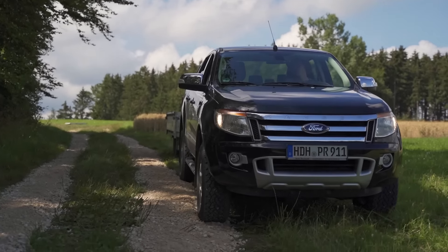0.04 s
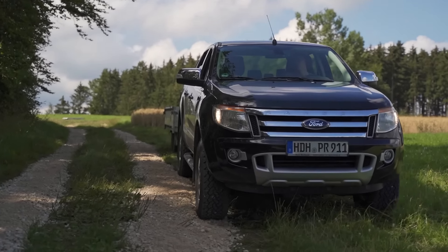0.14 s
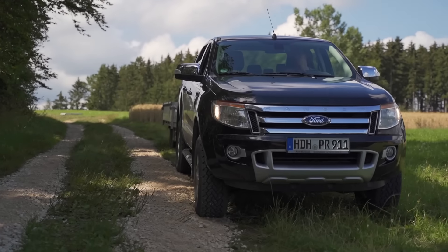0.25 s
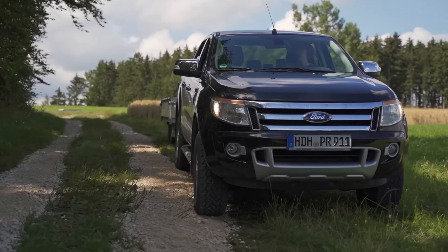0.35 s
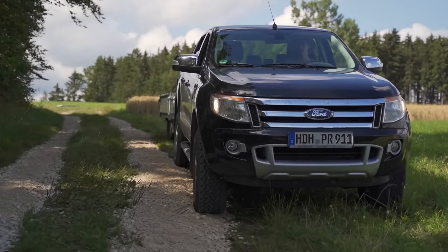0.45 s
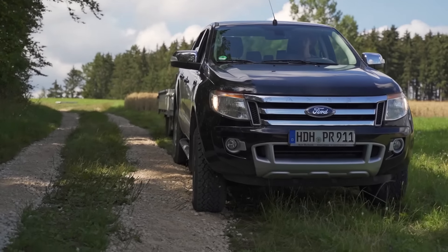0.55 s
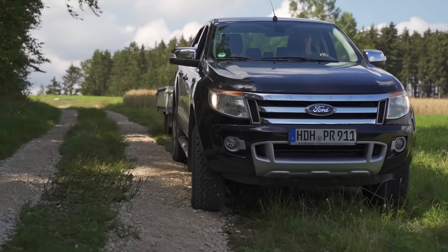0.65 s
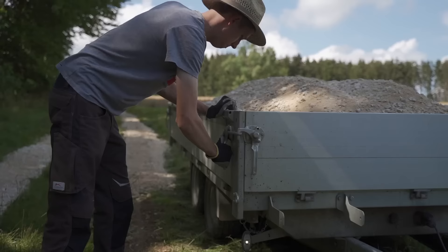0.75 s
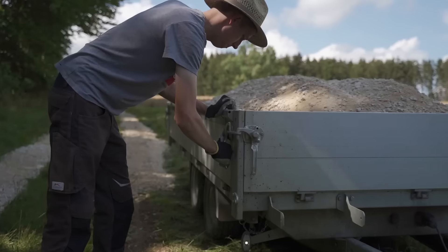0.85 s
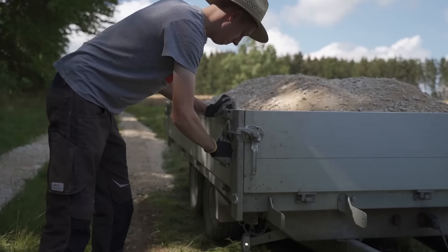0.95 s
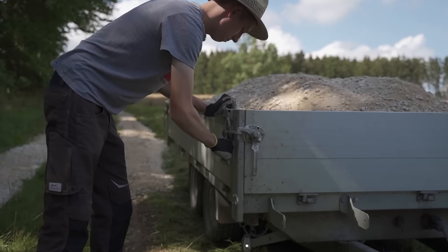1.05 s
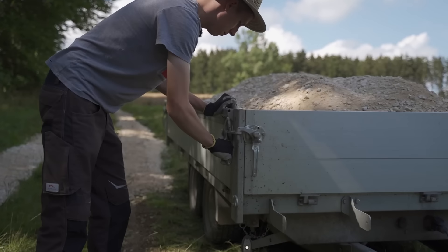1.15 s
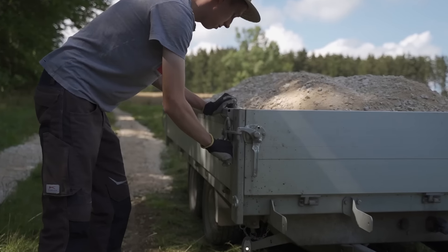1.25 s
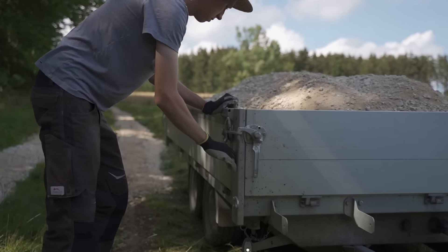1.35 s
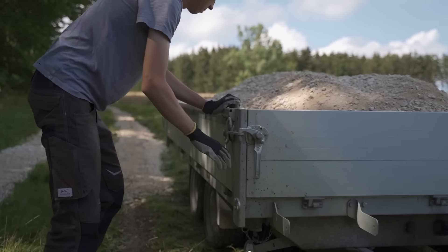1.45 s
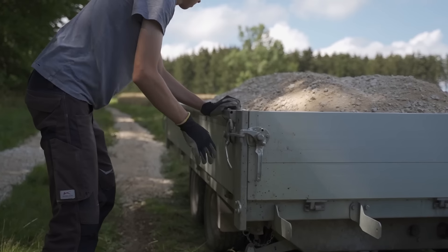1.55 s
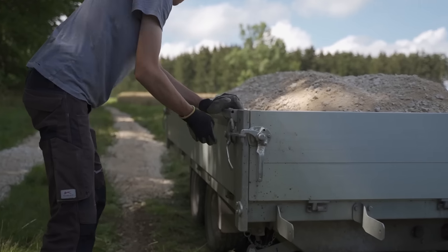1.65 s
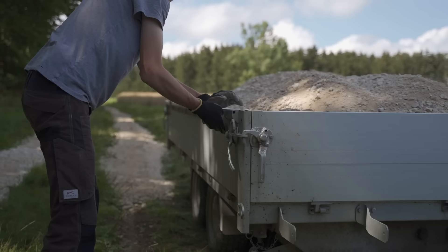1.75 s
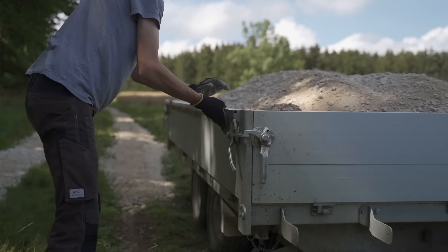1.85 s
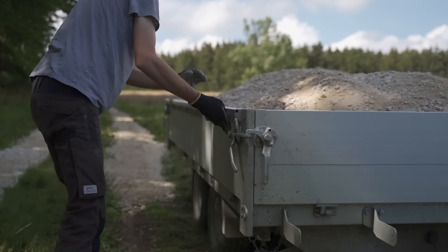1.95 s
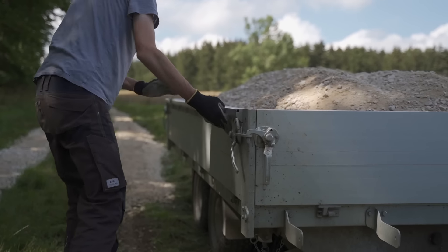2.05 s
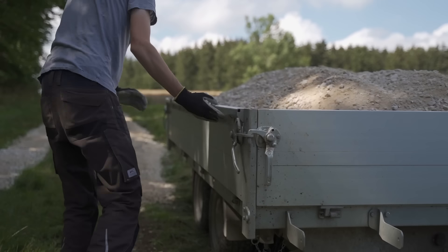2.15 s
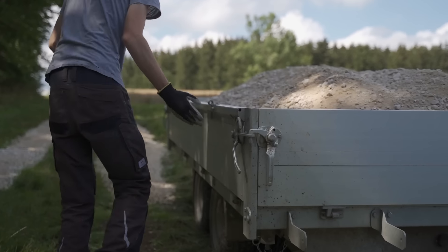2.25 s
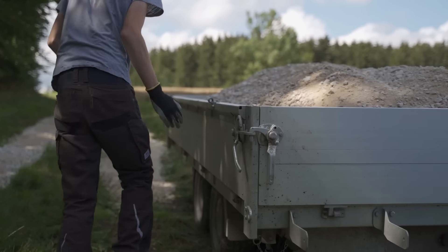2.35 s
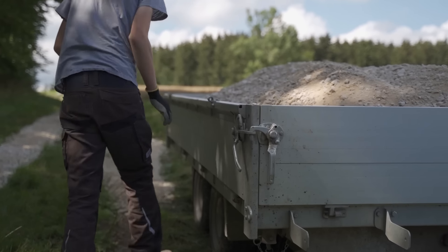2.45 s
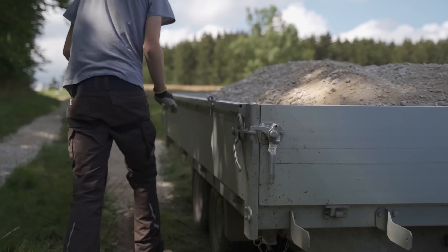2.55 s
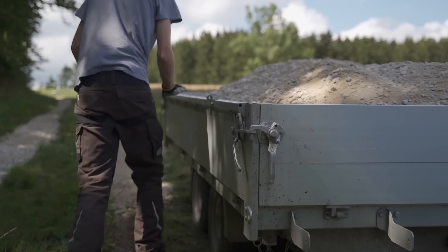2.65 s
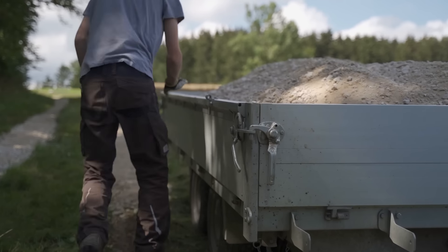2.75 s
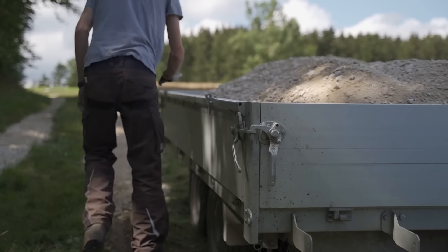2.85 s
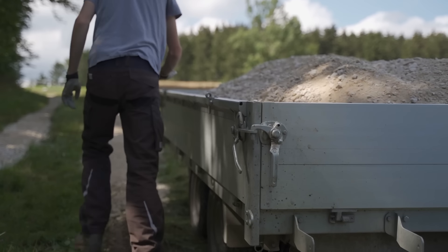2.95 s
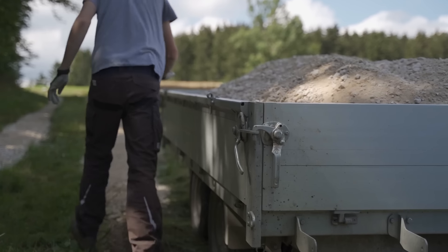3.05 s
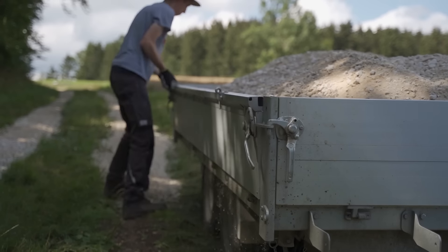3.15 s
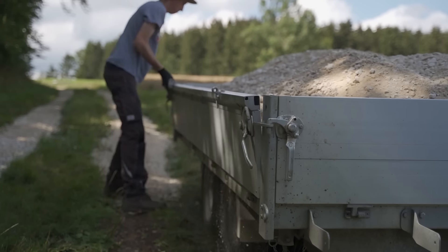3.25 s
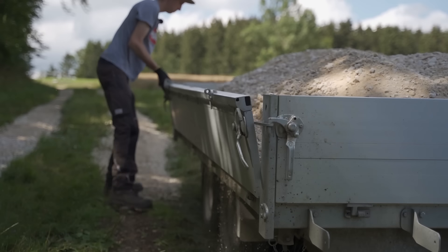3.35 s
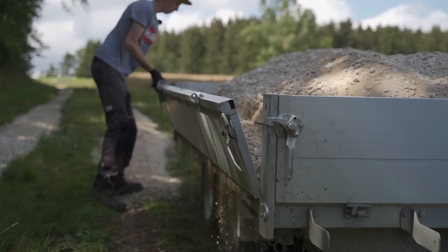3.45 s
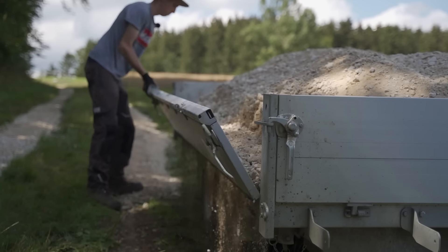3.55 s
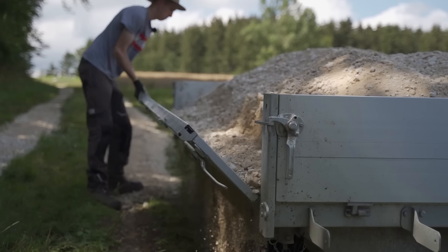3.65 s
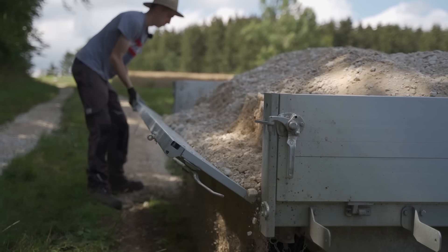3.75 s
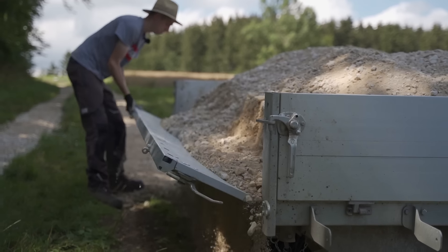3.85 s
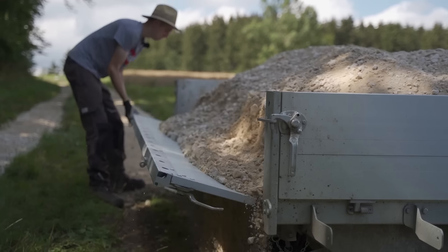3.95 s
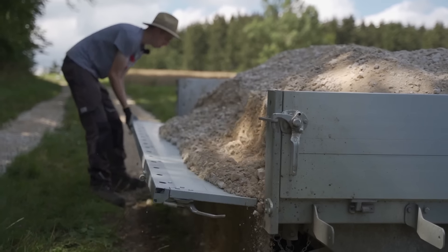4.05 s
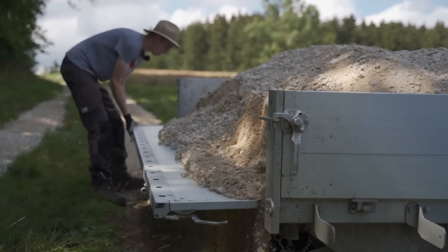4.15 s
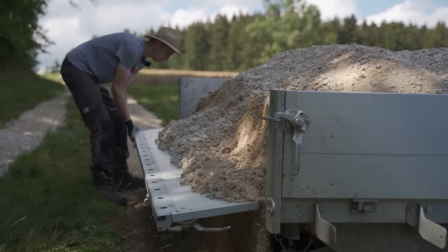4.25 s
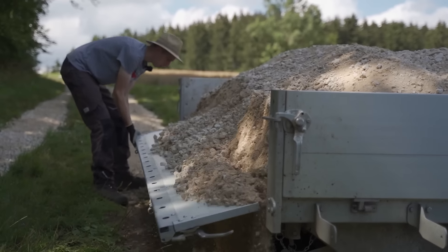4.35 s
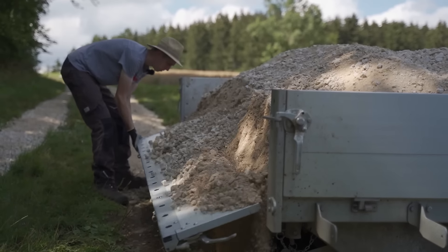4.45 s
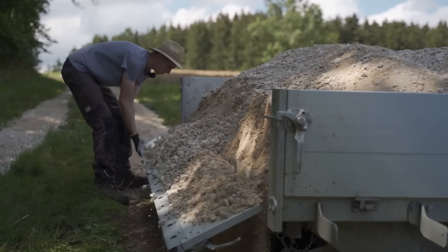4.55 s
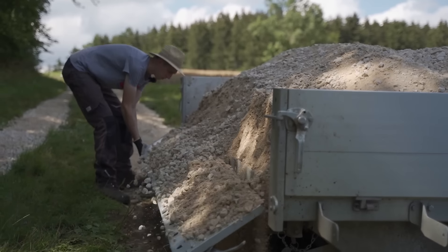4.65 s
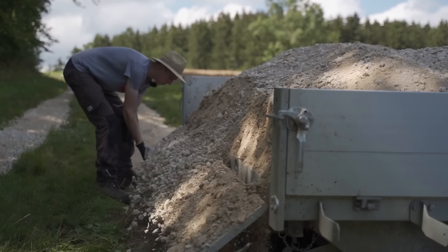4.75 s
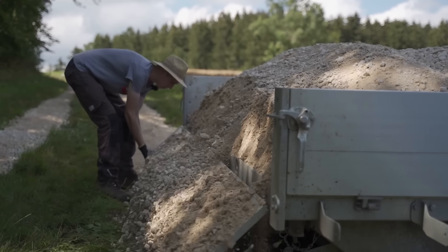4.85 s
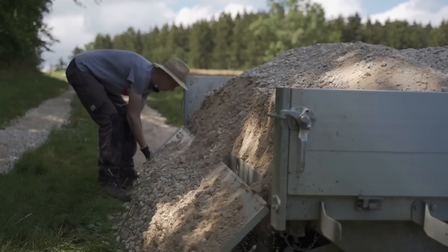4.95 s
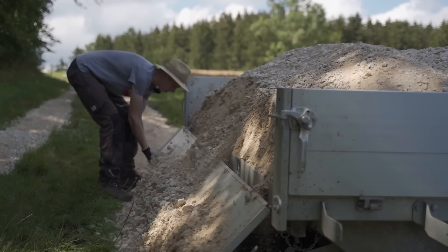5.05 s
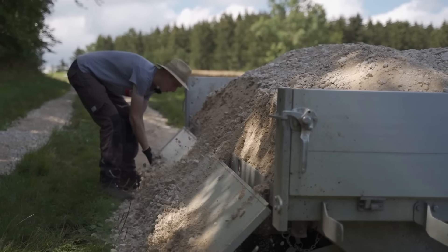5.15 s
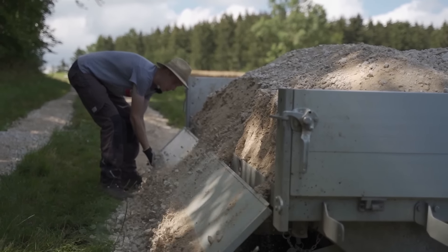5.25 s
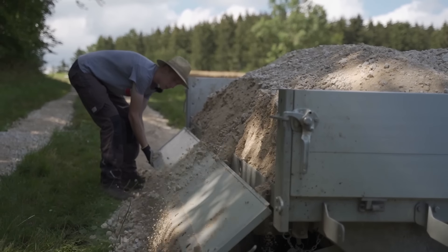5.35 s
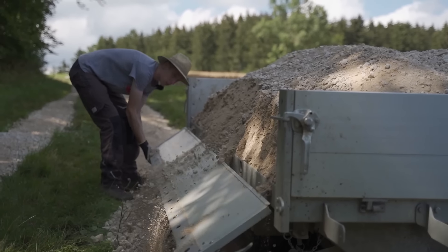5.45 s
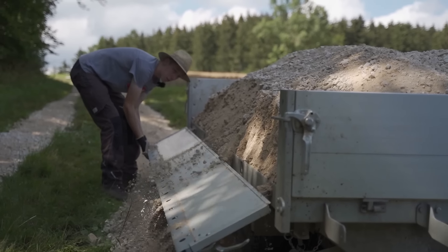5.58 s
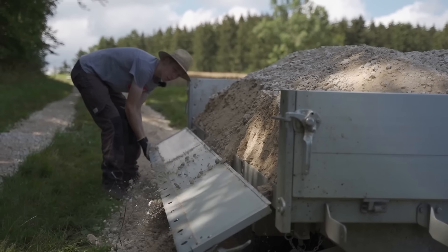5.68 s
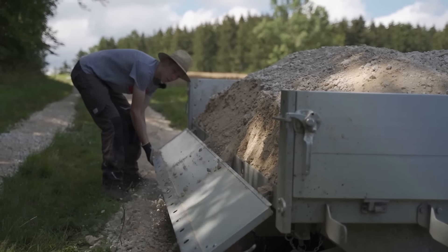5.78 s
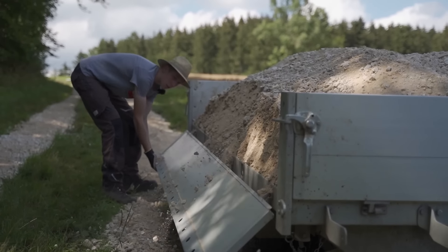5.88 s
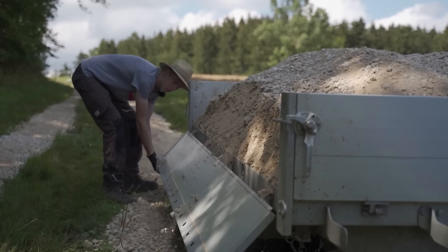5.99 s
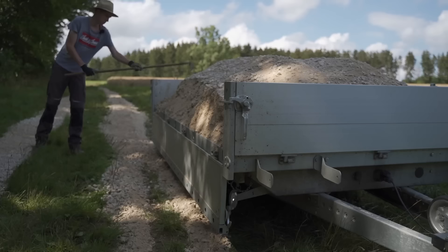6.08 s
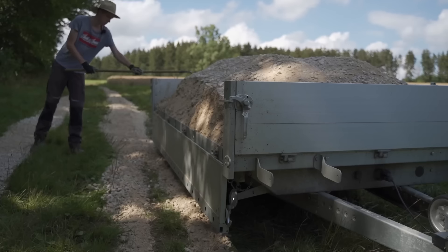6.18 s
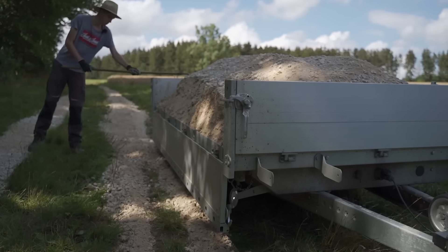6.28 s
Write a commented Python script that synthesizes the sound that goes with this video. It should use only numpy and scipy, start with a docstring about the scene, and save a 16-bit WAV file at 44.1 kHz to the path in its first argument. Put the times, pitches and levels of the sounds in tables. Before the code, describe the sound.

Quiet outdoor air, brief far engine hum, latch knocks, then gravel pours hissing and rattling over a metal trailer side before stopping abruptly.

```python
"""Gravel trickles from a trailer and swells to a rush over its lowered steel side board; the rush cuts off
abruptly and a few stones are heard. Many tiny impacts, shaped by the board's resonances, make its noise.
Before that a worker knocks the latch open twice: the latch bar rattles, clothes rustle, faint ticks sound.
A far engine, a hum in dull noise, is cut off early on; air is soft noise and jolts are short bass pushes.
The near sounds come from a little to the left of a pair of ports."""
import sys
import numpy as np
from scipy import signal
from scipy.fft import rfft, irfft, next_fast_len
from scipy.io import wavfile
from scipy.ndimage import map_coordinates

SR = 44100
rng = np.random.default_rng(int(sys.argv[2]) if len(sys.argv) > 2 else 0)


def inscribe(sig):
    """Save sig as 16-bit PCM at rate SR to the path in sys.argv[1].

    A 1-D sig is mono; a 2-D sig holds one channel per row.
    Samples are clipped to [-1, 1] before scaling.
    """
    pcm = np.round(np.clip(np.atleast_2d(sig).T, -1, 1) * 32767)
    wavfile.write(sys.argv[1], SR, pcm.astype(np.int16))


N = 278712
TIME = np.arange(N) / SR  # [s]
CUT_S = 6.121  # the near sound cuts off abruptly here; a few stones are heard after it


def amp(db):
    """Turn decibels into gain."""
    return 10 ** (np.asarray(db) / 20)


def unit(x):
    """Scale a sound to an rms of 1."""
    return x / np.sqrt(np.mean(x ** 2) + 1e-20)


def along(points, hz):
    """Read a curve of (frequency, value) points on a log frequency axis."""
    f, v = np.transpose(points)
    return np.interp(np.log(hz + 1), np.log(f + 1), v)


def curves(rows):
    """Give one value per sample for each column after the time."""
    s, *cols = np.transpose(rows)
    return [np.interp(TIME, s, c) for c in cols]


def wobble(rate):
    """Draw a smooth random curve with this many random points a second."""
    points = rng.standard_normal(int(N * rate / SR) + 4)
    return map_coordinates(points, [np.arange(N) * rate / SR])


def filtered(x, response):
    """Shape the spectrum of a sound by a (complex) response of frequency."""
    m = next_fast_len(N + SR // 2)
    return irfft(rfft(x, m) * response(np.fft.rfftfreq(m, 1 / SR)), m)[..., :N]


def below(f, edge_hz):
    """Steep loss above an edge, from three equal low-pass stages."""
    return 1 / (1 + 1j * f / edge_hz) ** 3


def body(peaks):
    """Response of an object with resonances (frequency [Hz], width [Hz], level [dB]), signs alternating."""
    def response(f):
        total = 0
        for k, (c, w, db) in enumerate(peaks):
            total = total + (-1) ** k * amp(db) * 1j * f * w / (c * c - f * f + 1j * f * w)
        return total
    return response


def impacts(rate, spread_db, life_s):
    """Noise chopped into hits with sudden starts and quick decay; a negative spread makes a few weaker."""
    hit = rng.random(N) < rate / SR
    size = hit * amp(spread_db * np.minimum(rng.exponential(1, N), 4))
    envelope = signal.lfilter([1], [1, -np.exp(-1 / (life_s * SR))], size)
    return unit(envelope * rng.standard_normal(N))


def pair(x, alike):
    """Mix two noises to a left and a right of the given likeness."""
    turn = lambda hz: np.arccos(np.clip(alike(hz), -1, 1)) / 2
    mid, side = filtered(x, lambda hz: np.array([np.cos(turn(hz)), np.sin(turn(hz))]))
    return np.array([mid + side, mid - side])


# colour of the field air: (frequency [Hz], level per Hz [dB])
AIR_COLOUR = [(12, -29), (20, -1), (86, -1.5), (120, 1), (228, -2), (262, 3), (301, -1.5), (410, 1),
              (527, -1.5), (718, 0.5), (1090, -4.5), (4300, -13), (16000, -15)]
# likeness of its left and right: (frequency [Hz], likeness [0 to 1])
AIR_LIKENESS = [(60, 1), (240, 0.97), (950, 0.96), (3770, 0.18), (15000, 0.11)]
AIR_DB = -65


def air():
    """Quiet breeze over the field: steady noise, less alike left and right in the treble."""
    noise = unit(filtered(rng.standard_normal((2, N)), lambda f: amp(along(AIR_COLOUR, f))))
    return amp(AIR_DB + 0.39 * wobble(9.2)) * pair(noise, lambda f: along(AIR_LIKENESS, f))


# colour of the engine's noise, before its low bass is cut: (frequency [Hz], level per Hz [dB])
ENGINE_COLOUR = [(12, -39), (20, -39), (49, -10.5), (103, 0), (201, -3), (318, -8), (427, -7), (474, -8),
                 (561, -6), (908, -11.5), (1850, -35.5), (3000, -34.5), (3900, -43), (6600, -120)]
# strength of each multiple of the firing rate, from the first up: level against the noise [dB]
ENGINE_ORDERS = [-10.5, -4.5, -13, -21, -22, -21.5, -12, -11, -30]
FIRING_HZ, ENGINE_DB, ENGINE_CUT_S = 26.7, -55, .783


def engine():
    """A far idling engine: multiples of its firing rate hum in dull noise, both sides alike; cut off abruptly."""
    colour = lambda f: amp(along(ENGINE_COLOUR, f)) * f ** 2 / (f ** 2 + 90 ** 2)
    noise = unit(filtered(rng.standard_normal(N), colour))
    turn = 2 * np.pi * FIRING_HZ * np.cumsum(1 + 0.0038 * wobble(3.3)) / SR  # the speed drifts a little
    waver = amp(1.5 * wobble(12))
    hum = 0
    for order, db in enumerate(ENGINE_ORDERS, start=1):
        own_waver = np.roll(waver, rng.integers(N))
        hum = hum + amp(db) * own_waver * np.sin(order * turn + 2 * np.pi * rng.random())
    audible = TIME < ENGINE_CUT_S
    return audible * amp(ENGINE_DB + 0.71 * wobble(11)) * (noise + hum)


# thin modes of the board: (frequency [Hz], level [dB], time to fall by 60 dB [s])
STEEL_MODES = [(1248, -10, .08), (1567, -8, .08), (1813, -7, .1), (2934, -8, .08), (3240, -6, .08),
               (3414, -6, .08), (3590, -1, .12), (3890, -4, .11), (4224, -2, .12), (4576, -3, .11),
               (4953, -1, .14), (5357, -2, .12), (5776, -6, .1), (6256, -8, .1), (6837, -9, .1),
               (7230, -9, .08), (7747, -10, .1)]


def steel(f, spread_db=0):
    """The long thin modes of the board; a spread raises or lowers each one by at most that much."""
    peaks = []
    for hz, db, t60 in STEEL_MODES:
        width_hz = np.log(1000) / np.pi / t60  # a longer ring means a narrower resonance
        peaks.append((hz, width_hz, db + rng.uniform(-spread_db, spread_db)))
    return body(peaks)(f)


# low bending of the board: (centre [Hz], width [Hz], level [dB])
BOARD_BENDING = [(283.5, 106, -2), (685, 443, 0), (990, 780, -10)]
# the board's hollow steel section: (centre [Hz], width [Hz], level [dB])
HOLLOW_SECTION = [(1726, 920, 4), (2325, 2030, 2), (3136, 680, 1.5), (3940, 3700, -5)]
# colour of fine grit: (frequency [Hz], level per Hz [dB])
GRIT_COLOUR = [(2350, -11.5), (4000, -7.5), (4820, -9.5), (5540, -6), (9060, -4.5), (11900, -12.5),
               (15200, -16.5), (16000, -31.5)]
# how many of the stones run over the bare board: (time [s], share [0 to 1])
BARE_SHARE = [(3.0, .05), (4.2, 0.069), (4.7, 0.65), (5.4, 0.97), (5.5, 0.94), (6.1, 0.87), (6.15, 0.81)]
# The three contact tables share these columns, with levels before the last filters:
# (time [s], knock level [dB], clatter level [dB], crack level [dB],
#  knock pitch [Hz], clatter pitch [Hz], time to fall by 60 dB, held to .01-.15 [s])
# faint ticks while the board is handled
HANDLING_TICKS = [(0.104, -42, -58, -53, 625, 1540, 0.057), (0.146, -40.5, -54, -68, 203, 2440, 0.05),
                  (0.386, -46, -53, -52.5, 506, 2610, 0.045), (0.502, -50, -53, -62, 202, 3680, 0.045),
                  (1.636, -64, -60, -67, 711, 1240, 0.045), (1.688, -69, -59, -57, 342, 3760, 0.045),
                  (2.087, -48, -69, -72, 420, 3040, 0.045), (2.268, -65, -69, -59.5, 673, 2870, 0.045),
                  (2.366, -54, -57, -54, 869, 2070, 0.033), (2.876, -46.5, -61, -72, 598, 3020, 0.045),
                  (2.958, -56, -45, -49, 474, 1770, 0.045), (2.985, -43, -60, -68, 840, 1460, 0.045),
                  (3.027, -47, -55, -69, 786, 1470, 0.053), (3.135, -56, -64, -42.5, 716, 2990, 0.037),
                  (3.153, -40.5, -57, -40, 603, 4060, 0.041)]
# the latch is knocked open, twice
LATCH_KNOCKS = [(.995, -57, -52, -50, 380, 2740, 0.077), (1.008, -29, -46, -56, 235, 1840, 0.065),
                (1.026, -64, -50, -46, 576, 1800, 0.035), (1.042, -12, -13.5, -8.5, 595, 2420, 0.031),
                (2.521, -33.5, -40, -54, 247, 1300, 0.064), (2.527, -28.5, -33.5, -55, 710, 1410, 0.056),
                (2.541, -21, -27.5, -41.5, 760, 1350, 0.022)]
# the stones that stand out of the stream
SINGLE_STONES = [(3.65, -20, -27, -46.5, 1040, 4420, 0.038), (3.697, -12.5, -28.5, -45, 900, 1270, .04),
                 (3.716, -19.5, -24.5, -27, 646, 2810, 0.054), (3.738, -12.5, -36, -17, 1060, 1270, 0.025),
                 (3.786, -0.5, -14.5, -22, 683, 1210, 0.018), (3.802, -22, -46, -26, 535, 1300, .04),
                 (3.813, -40, -20, -20, 716, 3380, .03), (3.85, -14.5, -44, -21, 850, 1310, .05),
                 (3.881, -14, -26.5, -24.5, 860, 1240, 0.037), (3.932, -23, -21.5, -19.5, 560, 3600, .02),
                 (3.999, -21, -22, -23, 694, 2750, 0.026), (4.037, -28, -21, -26, 810, 2330, .04),
                 (4.049, -11, -18.5, -15.5, 890, 1190, .02), (4.059, -30, -19, -20, 670, 3560, 0.058),
                 (4.099, -13, -21, -14.5, 820, 4000, 0.035), (4.118, -15.5, -14.5, -8.5, 720, 2280, 0.046),
                 (4.13, -12, -39, -21.5, 726, 1250, 0.065), (4.169, -20, -23, -20.5, 805, 2360, .02),
                 (4.214, -7.5, -16, -16, 840, 2300, 0.018), (4.248, -4, -17, -20, 790, 1360, 0.011),
                 (4.289, -14, -16, -9, 570, 2610, .035), (4.307, -15.5, -9.5, -23, 570, 4050, 0.019),
                 (4.319, -11, -17.5, -15.5, 774, 2280, 0.061), (4.378, -7, -20, -11, 670, 2100, 0.011),
                 (4.438, -20, -20, -16, 645, 3700, .08), (4.474, -3.5, -22, -8, 650, 1900, .05),
                 (4.526, -4, -8, -8.5, 630, 1860, 0.021), (4.736, -24, -8.5, -14.5, 744, 3460, 0.024),
                 (4.784, -33, -7.5, -16, 650, 3420, 0.028), (4.988, -13.5, -10.5, -25, 760, 3350, 0.091),
                 (5.048, -4.5, -29, -27, 330, 1630, 0.043), (5.1, -12, -8.5, -18, 674, 3320, 0.12),
                 (5.157, -11.5, -12, -29, 516, 1730, 0.042), (5.296, -33, -15, -35.5, 774, 3300, .07),
                 (5.38, -8.5, -8.5, -31, 594, 1950, 0.072), (5.504, -17, -6.5, -26.5, 640, 2930, 0.064),
                 (5.574, -12.5, -20, -23, 570, 2010, 0.049), (5.611, -16.5, -10.5, -14.5, 580, 2800, 0.039),
                 (5.687, -38, -17, -21.5, 673, 3210, .055), (5.72, -35, -11.5, -10.5, 746, 3420, .12),
                 (5.782, -14.5, -13.5, -33, 586, 3200, 0.085), (5.845, -16, -14.5, -25, 580, 3280, 0.068),
                 (5.871, -12, -27, -26.5, 574, 1520, .04), (5.903, -26, -30, -8.5, 253, 3670, 0.046),
                 (5.969, -30, -26.5, -18, 790, 3200, .05), (6.01, -16, -10.5, -13, 483, 3300, .045),
                 (6.039, -9, -44, -17, 554, 3650, 0.016), (6.054, -14, -18, -9, 560, 4320, 0.028),
                 (6.074, -33, -20.5, -8, 690, 3490, .09), (6.114, -20, -12.5, -13, 517, 2830, 0.016),
                 (6.153, -55, -56, -24, 330, 2920, 0.018), (6.175, -62, -45, -37, 264, 4400, 0.08),
                 (6.202, -25, -25.5, -18.5, 980, 2030, 0.14), (6.233, -45, -24, -20, 790, 2200, 0.032),
                 (6.256, -47, -44, -22.5, 337, 2570, .04), (6.3, -45, -28.5, -23, 1020, 3580, 0.064)]
CRACK_HZ = (4500, 8300)  # each contact cracks somewhere in this range
RING_DB, RING_SPREAD_DB = 36, 7  # strength of the thin modes, and how unevenly one touch reaches them


def contacts():
    """Each contact is a dull knock, a dying noise burst that clatters and cracks, and a ring of thin modes."""
    knocks, bright = np.zeros(N + SR), np.zeros(N + SR)
    t = np.maximum(np.arange(-128, 6016) / SR, 0)  # a silent lead-in, then the contact
    f = np.fft.rfftfreq(len(t), 1 / SR)
    touch = rfft(signal.unit_impulse(len(t), 132))
    hollow, grit = body(HOLLOW_SECTION)(f), amp(along(GRIT_COLOUR, f))
    rise = 1 - np.exp(-t / 0.00021)
    for s, knock_db, clatter_db, crack_db, knock_hz, clatter_hz, t60 in LATCH_KNOCKS + HANDLING_TICKS + SINGLE_STONES:
        first = round(s * SR) - 40
        span = slice(first, first + len(t))
        alive = (t + s < CUT_S) | (s > CUT_S)  # earlier contacts end at the cut
        burst = amp(-60 * t / np.clip(t60, .01, .15)) * rise * rng.standard_normal((3, len(t)))
        # the knock falls by 60 dB in seven cycles
        push = np.sin(2 * np.pi * knock_hz * t) * amp(-60 * t * knock_hz / 7.0) * rise
        knocks[span] += alive * amp(knock_db) * (push + 0.17 * burst[2])

        crack_hz = rng.uniform(*CRACK_HZ)
        narrow = body([(clatter_hz, .25 * clatter_hz, 0)])(f)
        wide = body([(clatter_hz, 1.4 * clatter_hz, 0)])(f)
        clatter = below(f, 2.06 * clatter_hz) * (0.73 * narrow + 0.42 * hollow * wide)
        crack = grit * (0.52 + body([(crack_hz, .25 * crack_hz, 0)])(f))
        parts = irfft(np.array([clatter, crack]) * rfft(burst[:2]))
        peak_gain = amp([clatter_db, crack_db]) / np.abs(parts).max(axis=1)

        bare = np.interp(s, *np.transpose(BARE_SHARE))
        ring = bare * amp(clatter_db + RING_DB) * steel(f, RING_SPREAD_DB)
        bright[span] += alive * (peak_gain @ parts + irfft(ring * touch))
    bend = lambda f: 0.38 * body(BOARD_BENDING)(f) + body([(900, 2600, 3)])(f) * below(f, edge_hz=9600)
    return filtered(knocks[:N], bend) + bright[:N]


def tail(t60):
    """Dying noise of energy 1."""
    t = np.arange(SR // 4) / SR
    x = rng.standard_normal(len(t)) * amp(-60 * t / t60)
    return x / np.linalg.norm(x)


def trailer_answer(hits):
    """The trailer body answers each contact with a short, dull tail."""
    echo = signal.fftconvolve(hits, tail(0.12))[:N]
    return amp(-10) * filtered(echo, lambda f: 1 / (1 + 1j * f / 2500))


# rubs of fabric: (time of the peak [s], level at the peak before band weighting [dB],
#  strongest frequency [Hz], rise [s], fall [s])
CLOTH_RUBS = [(.15, -64.5, 3860, .02, 0.11), (.43, -61.5, 3850, .08, 0.067), (.516, -73.5, 3820, .04, 0.44),
              (1.1, -67.5, 4890, .01, .1), (1.3, -72, 4480, 0.36, .3), (1.442, -57, 6830, 0.078, .02),
              (1.582, -65.5, 6900, 0.13, 0.15), (1.812, -63, 4960, 0.26, 0.089),
              (1.975, -69, 4090, .06, .01), (2.168, -65.5, 5120, 0.18, 0.06), (2.288, -70, 3100, .07, 0.11),
              (2.7, -73, 3420, 0.24, 0.14), (2.856, -67.5, 3100, 0.044, 0.094),
              (2.96, -60.5, 3280, 0.0087, 0.061), (3.03, -60, 3280, 0.022, 0.023),
              (3.1, -63.5, 3480, .03, .03)]
FADE_DB = 20  # a rub changes by this much over its rise and over its fall


def cloth():
    """Clothes rustle: fine grains of noise swell and die in bands around each rub's strongest frequency."""
    fibres = impacts(2500, spread_db=-14.5, life_s=0.0022)
    rubs = []
    for s, db, hz, rise, fall in CLOTH_RUBS:
        distance = np.maximum((s - TIME) / rise, (TIME - s) / fall)
        rubs.append((hz, amp(db - FADE_DB * distance)))
    out = np.zeros(N)
    for c in (3080, 4400, 6530, 10100):  # band centres [Hz]
        band = unit(filtered(fibres, lambda f: body([(c, .45 * c, 0)])(f) ** 2))
        out += band * sum(np.exp(-(np.log(hz / c) / 0.35) ** 2) * level for hz, level in rubs)
    return out


# modes of the latch bar: (frequency [Hz], level [dB], time to fall by 60 dB, at most .5 [s])
LATCH_BAR = [(171, 3.5, 0.2), (355, -12, 1.2), (1310, -10, 0.26), (1904, -12.5, 0.16), (2240, -27, 0.39),
             (2780, -4, 0.11), (3000, -15, 0.18), (4360, -11, 0.26), (5330, -31, 0.23), (5539, -34.5, 0.34),
             (6240, -15.5, 0.2), (6770, -13.5, 0.18), (7100, -34, 0.62), (7300, -23, 0.48),
             (8301, -16, 0.222), (8753, -7, 0.13), (9000, -11, 0.099), (9940, -34, 1.0)]
CLANK_S, CLANK_DB = .787, -43


def clank():
    """The latch bar rattles: its modes swell in briefly, roughened by chatter, and ring out with a scrape."""
    t, chatter, start = np.arange(SR // 2) / SR, wobble(170), round(CLANK_S * SR)
    ring = 0
    for hz, db, t60 in LATCH_BAR:
        mode = amp(db - 60 * t / min(t60, .5)) * np.sin(2 * np.pi * (hz * t + rng.random()))
        own_chatter = chatter[rng.integers(N // 2):][:len(t)]
        ring = ring + mode * (1 + 0.96 * own_chatter)
    rough = filtered(rng.standard_normal(N), body([(1800, 2000, 0), (6500, 6000, -2)]))[:len(t)]
    scrape = amp(-2 - 60 * t / 0.2) * rough
    swell = np.minimum(t / 0.023, 1) ** 2
    return np.pad(amp(CLANK_DB) * swell * (ring + scrape), (start, N - start - len(t)))


# bass jolts through the ground: (time [s], level before decay [dB])
JOLTS = [(1.046, -54), (1.489, -55), (2.089, -69.5), (2.545, -32), (2.876, -34), (3.787, -24),
         (4.525, -55.5), (5.848, -29)]
JOLT_HZ, JOLT_T60 = 60, 0.0077  # pitch [Hz], time to fall by 60 dB [s]


def jolts():
    """One soft low push for each jolt: a sine that dies almost at once."""
    out, t = np.zeros(N + SR), np.arange(4096) / SR
    for s, db in JOLTS:
        out[round(s * SR):][:len(t)] += amp(db - 60 * t / JOLT_T60) * np.sin(2 * np.pi * JOLT_HZ * t)
    return out[:N]


# the stream of gravel, levels before surges and later filters:
# (time [s], rumble of the board level [dB], clatter on steel level [dB], hiss of grit level [dB])
GRAVEL_FLOW = [(3.05, -77, -78, -79), (3.2, -55.5, -80, -59), (3.33, -51, -58, -47),
               (3.5, -45.5, -53.5, -38.5), (3.62, -37.5, -43, -38), (3.8, -44, -42, -41),
               (3.96, -40.5, -53.5, -38.5), (4.1, -41.5, -42.5, -45.5), (4.22, -36, -34.5, -32),
               (4.4, -27, -32, -25), (4.65, -26, -27, -23), (4.94, -28, -23, -19.5), (5.1, -30, -24.5, -19),
               (5.38, -31, -28.5, -21.5), (5.52, -32, -27, -21.5), (5.7, -36, -31.5, -28),
               (5.93, -43.5, -60, -31), (6.118, -32.5, -27, -34), (6.126, -71, -88.5, -47),
               (6.32, -62.5, -43, -57)]


def gravel():
    """Stones drum the board, clatter and ring on its steel; grit hisses. All surge together."""
    rumble_db, clatter_db, hiss_db = curves(GRAVEL_FLOW)
    bare = np.clip(curves(BARE_SHARE)[0], 0, 1)
    loose = np.sqrt(1 - bare ** 2)
    surge = 0.76 * wobble(12) + .5 * wobble(45)  # [dB]
    big = impacts(400, spread_db=5.0, life_s=0.0015)
    small = impacts(2500, spread_db=-1.0, life_s=0.0038)

    drum = .5 * big + .8 * impacts(4000, spread_db=4, life_s=.006)
    boxy = unit(filtered(drum, lambda f: body(BOARD_BENDING)(f) ** 2))
    broad = unit(filtered(drum, lambda f: body([(650, 900, 0)])(f) ** 2))  # a loaded board is damped
    rumble = amp(rumble_db + surge + 1.2 * wobble(17)) * (bare * boxy + 0.92 * loose * broad)

    strike = amp(clatter_db + surge + 1.6 * wobble(25)) * (0.56 * big + 0.47 * small)
    section = np.zeros(N)
    for peak in HOLLOW_SECTION:
        flare = amp(4.0 + 2.3 * wobble(22))  # each resonance flares on its own
        section += filtered(flare * bare * strike, lambda f: body([peak])(f) ** 2)
    ring = amp(18) * filtered(bare * strike, steel)
    # stone on stone and soil: no ring
    dull = lambda f: body([(2500, 4000, 0)])(f) * below(f, edge_hz=22000)
    soil = amp(8.5) * filtered(loose * strike, dull)

    grit = 0.41 * small + 0.77 * impacts(10000, spread_db=5.5, life_s=0.001)
    grit = unit(filtered(grit, lambda f: amp(along(GRIT_COLOUR, f))))
    hiss = amp(hiss_db + surge + 0.49 * wobble(30)) * grit
    dull_hiss = filtered(hiss, lambda f: 1 / (1 + (f / 10500) ** 4))  # grit on soil is duller
    hiss = bare * hiss + 1.2 * (1 - bare) * dull_hiss
    started = np.arange(N) > GRAVEL_FLOW[0][0] * SR
    return started * (rumble + section + ring + soil + hiss)


# the left port's head start: (frequency [Hz], phase lead [rad])
LEFT_LEAD = [(100, .01), (700, .04), (1400, .08), (2240, .13), (4310, .48), (8000, 1.1), (11900, 1.7),
             (15800, 2.3)]


def direct(near):
    """Near sound travels straight to both ports; the left one leads in phase."""
    sides = np.array([[1], [-1]])
    return filtered(np.array([near, near]), lambda f: np.exp(.5j * along(LEFT_LEAD, f) * sides))


def scattered(near):
    """Treble scattered by the heap: it arrives at each port with ever new phases."""
    hz, _, z = signal.stft(near, SR, nperseg=256)
    turn = np.exp(2j * np.pi * rng.random((2,) + z.shape))
    treble = (hz ** 2 / (hz ** 2 + 2500 ** 2))[:, None]
    return signal.istft(z * turn * treble, SR, nperseg=256)[1][:, :N]


def scene():
    """Near sources lose their bass and reach the left port first; jolts, engine and air are added."""
    hits = contacts()
    near = gravel() + hits + trailer_answer(hits) + clank() + cloth()
    near = filtered(near, lambda f: (1j * f / (95 + 1j * f)) ** 3)
    # at the cut the near level drops suddenly, then returns within 28 ms
    since = TIME - CUT_S
    hush = np.where(since < 0, 1, np.clip(since / 0.028, .45, 1) ** 3)
    return hush * (direct(near) + amp(-7) * scattered(near)) + jolts() + engine() + air()


def record(dry):
    """Keep only what lies below the band limit of 16 kHz."""
    return filtered(dry, lambda hz: hz < 16000)


dry = scene()
out = record(dry)
inscribe(out)
```